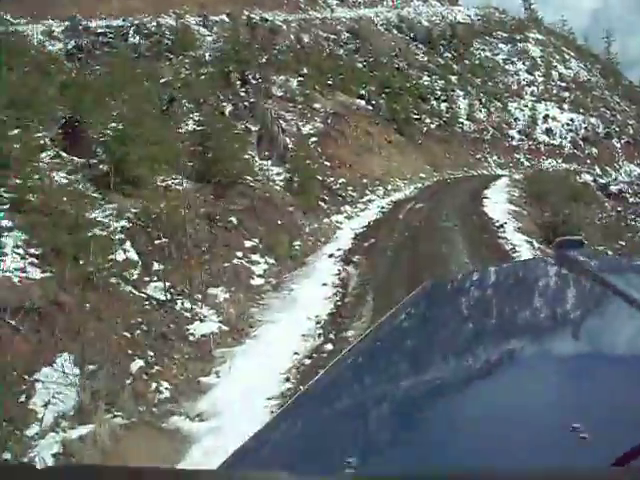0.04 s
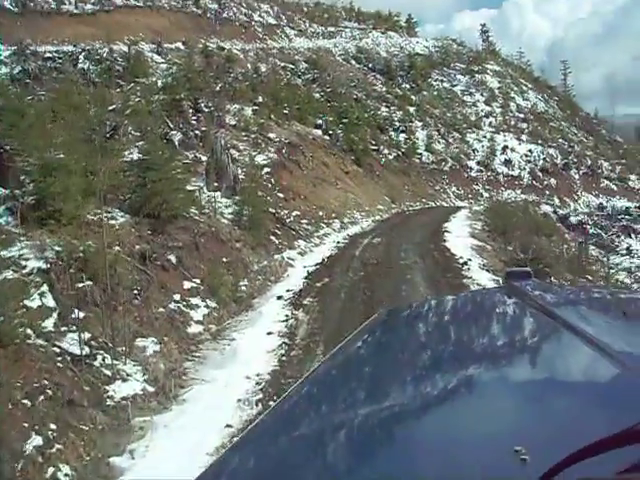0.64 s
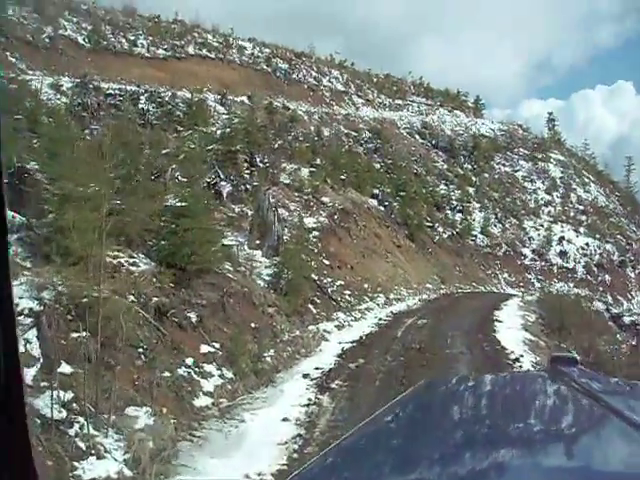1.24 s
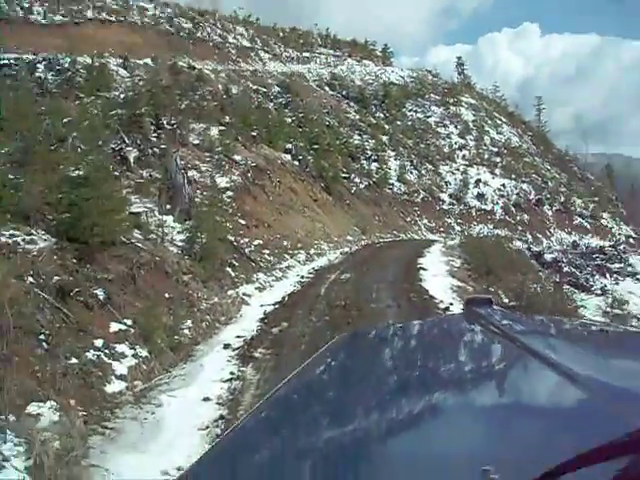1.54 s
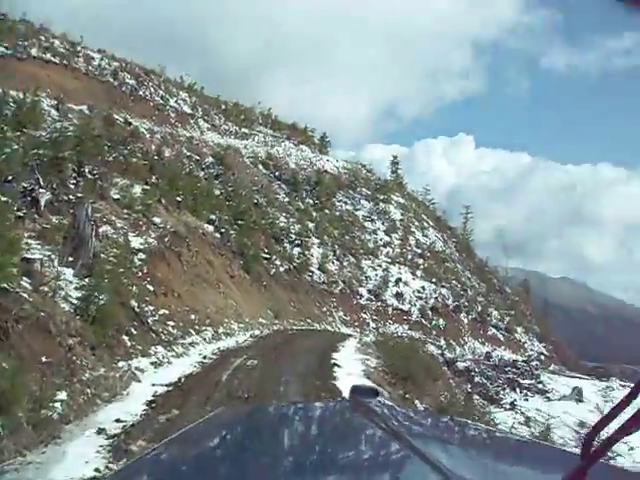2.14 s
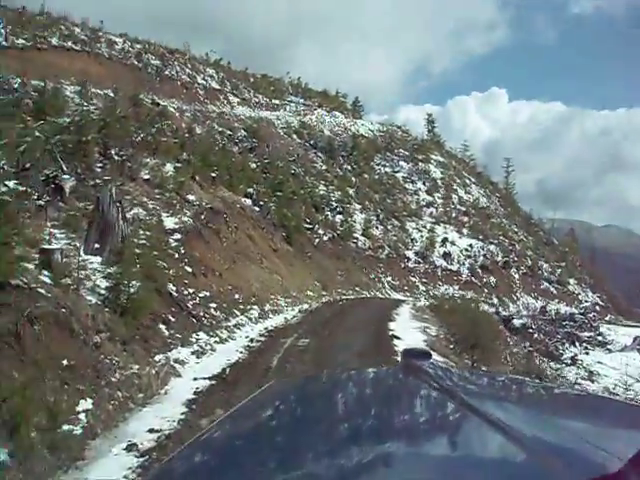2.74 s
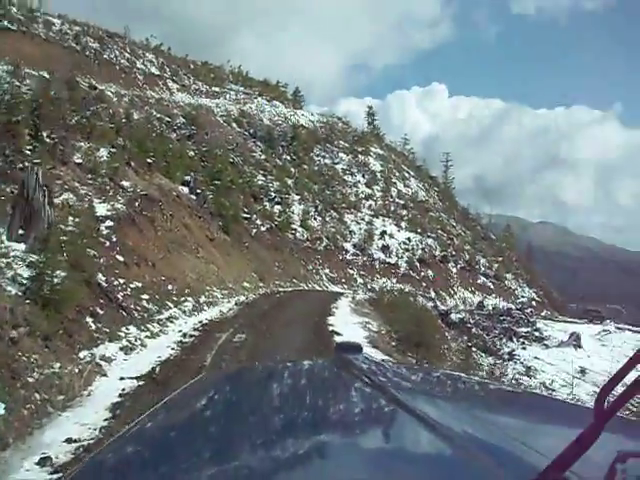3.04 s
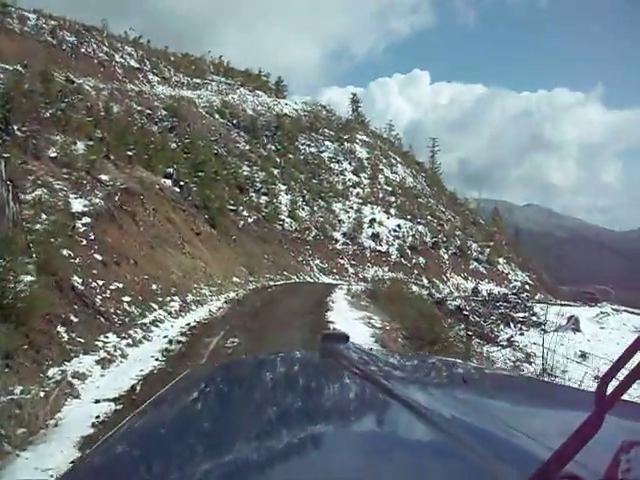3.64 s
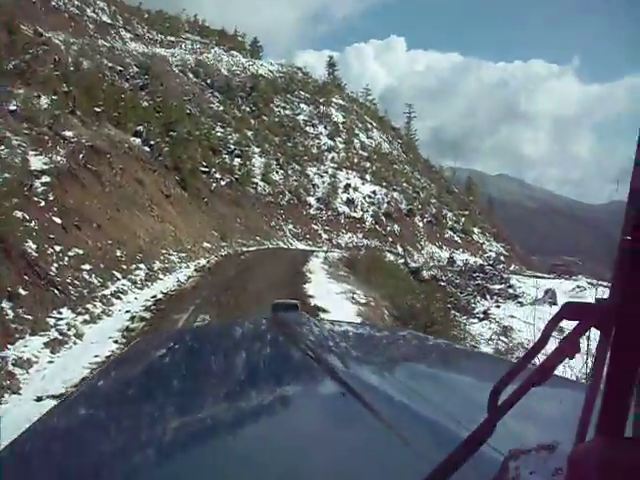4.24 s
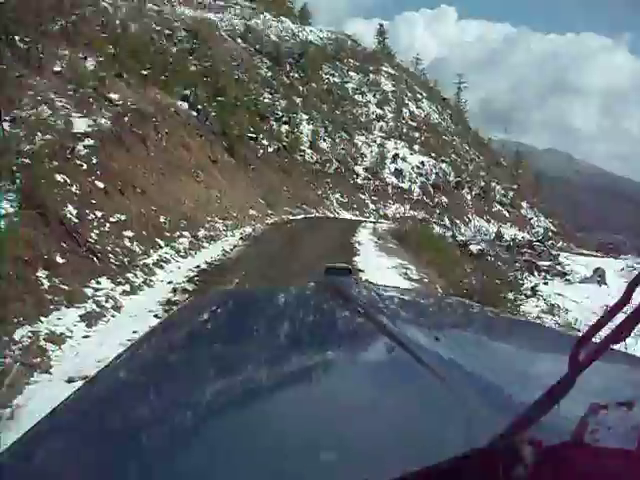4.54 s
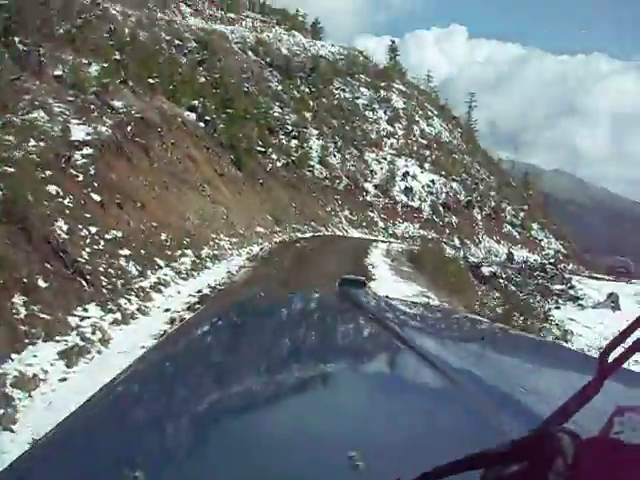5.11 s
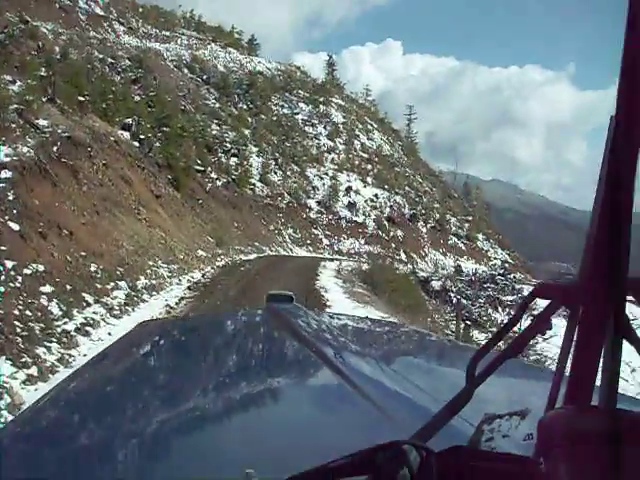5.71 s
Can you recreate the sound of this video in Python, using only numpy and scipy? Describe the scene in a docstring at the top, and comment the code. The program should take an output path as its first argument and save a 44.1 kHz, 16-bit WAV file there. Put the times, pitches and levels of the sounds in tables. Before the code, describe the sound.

A truck's diesel engine pulls along a rough gravel road, heard from the cab with tyre rumble, thumps, knocks and rattles.

```python
"""A six-cylinder diesel, heard in the cab of a loaded log truck on a gravel mountain road.
Its exhaust booms under load, eases over a rough stretch and pulls again, with injector clatter,
turbo whistle and gear whine. Tyres rumble, stones tick, bumps thump through the cab and loose
fittings knock, rattle and squeak. A small narrow-band recorder clips on the hardest hits."""
import sys
import numpy as np
from scipy import signal
from scipy.fft import rfft, irfft, next_fast_len
from scipy.io import wavfile

SR = 44100
rng = np.random.default_rng(int(sys.argv[2]) if len(sys.argv) > 2 else 0)


def master_out(mix):
    """Clip the mix to full scale and print it as 16-bit PCM to the path in sys.argv[1]."""
    frames = np.transpose(np.atleast_2d(mix))
    ceiling = np.clip(frames, -1, 1)
    pcm = np.round(ceiling * 32767).astype(np.int16)
    wavfile.write(sys.argv[1], SR, pcm)


N = 258867
T = np.arange(N) / SR

# road roughness: time_s, level_db
ROAD_ROUGHNESS = [(0, -6), (1.0, -1.5), (1.7, 5), (2.2, -4), (2.75, -0.5), (3.5, 0.5), (4.15, -9.5),
                  (4.7, -9.5), (5.3, -6), (5.87, 0.5)]
# tyre rumble: freq_hz, density_db
RUMBLE_SPECTRUM = [(30, -15), (60, 0), (110, 6), (190, 0), (300, -30), (600, -11.5), (1000, -14.5),
                   (1600, -26.5)]
# cab sway: freq_hz, density_db
SWAY_SPECTRUM = [(10, -19.5), (16, 1), (26, 9), (36, -3), (55, -19), (100, -45)]
# stone ticks: freq_hz, density_db
STONE_SPECTRUM = [(550, -6.5), (800, -3), (1020, -1.5), (1350, -1), (1900, -11.5)]
# suspension jolts: time_s, peak_db, push_s
JOLTS = [(1.57, -8, .0018), (1.638, 2.5, .0014), (1.908, -4, .0011), (2.458, -11.5, 0.0016),
         (2.755, -12, 0.0016), (2.928, -10.5, .001), (2.941, -6.5, 0.0017), (3.017, 0, 0.0016),
         (3.194, -8, 0.0018), (3.421, -9.5, 0.0021), (3.593, -5.5, 0.002), (3.795, -7, 0.0018),
         (4.01, -2.5, .0018), (5.268, -9, .002), (5.523, -7, .0014)]
# trim rubs: time_s, pitch_hz, level_db, half_width_s
TRIM_RUBS = [(3.048, 3390, -16.5, 0.017), (3.097, 4530, -17.5, 0.018), (3.424, 4240, -20, 0.017),
             (4.088, 3760, -20, 0.02), (4.205, 4100, -23.5, 0.028)]
# bursts of metal contacts: start_s, level_db, length_s
RATTLE_BURSTS = [(0.955, -20.5, 0.034), (1.603, -20, 0.033), (1.846, -10.5, 0.0023), (1.873, -19, 0.0033),
                 (1.883, -16.5, 0.018), (3.845, -19.5, .012), (4.3088, -7.5, 0.018)]
# metal contacts: freq_hz, density_db
RATTLE_SPECTRUM = [(200, -14), (500, -1.5), (900, -4), (1400, 4), (1900, 4), (2500, 6), (3300, 3.5),
                   (4200, 2.5), (5300, -4.5)]
# blows on a loose fitting: start_s, level_db
FITTING_HITS = [(1.224, -14), (2.207, -9), (2.482, -11), (2.672, -12.5), (2.797, -15.5), (2.972, -7),
                (3.089, -12.5), (3.381, -14), (3.441, -10), (3.647, -13.5), (3.754, -11.5), (3.851, -10.5),
                (3.973, -14), (5.216, -14), (5.305, -14.5)]
# fitting modes: freq_hz, gain_db, t60_s
FITTING_MODES = [(834, -21.5, 0.0027), (1070, -1.5, 0.02), (1220, -5, 0.014), (2400, -18, .002)]
# bounces of a heavy metal part: start_s, level_db
HEAVY_PART_HITS = [(1.854, 3), (1.866, -7), (1.877, -1.5), (1.889, -11), (1.896, 3), (1.900, -0.5),
                   (1.907, 6), (1.926, -8)]
# heavy part modes: freq_hz, gain_db, t60_s
HEAVY_PART_MODES = [(300, -26.5, 0.086), (488, -18, 0.11), (978, -8.5, 0.031), (1230, -4.5, 0.04),
                    (1323, -7, 0.033), (1807, -15.5, 0.024), (2170, -10.5, 0.018)]
# crank speed: time_s, turns_per_s
CRANK_SPEED = [(0, 23.7), (.25, 23.8), (.62, 25), (.75, 25.7), (.98, 27.1), (1.35, 25.75), (1.8, 26.9),
               (2.1, 27.6), (3.0, 25.2), (3.58, 25.2), (3.85, 22.6), (4.17, 20.7), (4.43, 23.6),
               (4.65, 23.5), (4.88, 24.5), (5.12, 24.35), (5.5, 23.8), (5.87, 25.8)]
# engine noise: time_s, clatter_db, air_db
ENGINE_NOISE_LEVELS = [(0, -27, -25), (.4, -26.5, -39.5), (1.1, -25, -26.5), (1.48, -24.5, -27.5),
                       (1.75, -21.5, -23.5), (2.5, -23, -20), (3.8, -25, -21.5), (4.25, -26, -20.5),
                       (4.52, -25.5, -23.5), (4.95, -22.5, -19.5), (5.28, -22, -17.5), (5.87, -22.5, -18)]
# turbo blade tone: time_s, pitch_hz, level_db
BLADE_TONE = [(0, 2585, -52), (.5, 2674, -30.5), (.92, 2824, -22), (1.1, 2933, -27.5), (1.42, 3087, -32),
              (1.75, 3356, -24), (2.1, 3490, -29), (3.5, 3562, -47.5), (4.4, 3080, -28),
              (4.78, 2995, -28.5), (5.15, 3222, -20), (5.3, 3412, -19.5), (5.55, 3447, -20),
              (5.87, 3595, -29)]
# turbo air: freq_hz, density_db
AIR_SPECTRUM = [(1500, -22), (2400, 0), (3000, 1), (3500, 6), (3900, 3.5), (4300, 1), (4700, -14),
                (5300, -25.5)]
# intake pipe resonances: freq_hz, width_hz, gain_db
INTAKE_MODES = [(2730, 22, 0), (2825, 25, 2), (2945, 25, -3), (3015, 25, 0), (3190, 40, -2), (3330, 35, -3),
                (3470, 35, 0), (3580, 35, -2), (3710, 35, 5)]
# knock of each cylinder: gain_db
CYLINDER_KNOCK_DB = [0.9, -3.5, -5, -2.5, 0, 4.5]
# diesel clatter: freq_hz, density_db
CLATTER_SPECTRUM = [(200, -22.5), (330, -10.5), (450, -12.5), (620, -11), (800, -18.5), (1020, -6),
                    (1200, -0.5), (1500, -0.5), (2000, 3), (2400, 1), (2900, 3), (3600, -2.5), (4400, -4),
                    (5300, -11.5)]
# block and firewall resonances: freq_hz, width_hz, gain_db
PANEL_MODES = [(303.7, 14, -20), (437, 40, -27), (495, 34, -26.5), (586, 50, -18), (1090, 68, -18.5),
               (1265, 150, -24), (1458, 19, -17.5), (1790, 14, -15.5), (1891, 41, -8), (2040, 45, -12),
               (2567, 17, -17)]
# weaker engine tones: crank_multiple, level_db
ENGINE_ORDERS = [(.5, -33.5), (1, -30.5), (2, -43), (2.5, -43), (3, -34.5), (3.5, -45), (4, -50),
                 (4.5, -36), (5, -42.5), (5.5, -38), (6.5, -42), (7, -45.5), (7.5, -48.5), (8, -40),
                 (8.5, -47), (9, -48), (10, -58), (11, -49), (12, -52), (12.5, -58), (13, -56)]
# exhaust boom, following load: time_s, level_db
BOOM_LEVEL = [(0, -19), (.25, -20), (.75, -15), (1.0, -27), (1.35, -12.5), (1.65, -20), (1.95, -33.5),
              (3.3, -37), (4.5, -25), (4.8, -16.5), (5.87, -17)]


def from_db(db):
    """Decibels to gain."""
    return 10 ** (np.asarray(db) / 20)


def unit_rms(x):
    """Scale to rms 1."""
    return x / np.sqrt(np.mean(x ** 2) + 1e-20)


def curves(rows):
    """Each column after time_s, at every sample."""
    times_s, *columns = np.transpose(rows)
    return [np.interp(T, times_s, column) for column in columns]


def noise():
    """White noise."""
    return rng.standard_normal(N)


def drift(rate_hz, hop=40, settle=2000):
    """Smooth random wander, rms 1."""
    r = np.exp(-2 * np.pi * rate_hz * hop / SR)
    steps = rng.standard_normal(N // hop + settle + 2)
    slow = signal.lfilter([1], [1, -2 * r, r * r], steps)[settle:]
    return np.interp(np.arange(N) / hop, np.arange(len(slow)), unit_rms(slow))


def coloured(x, spectrum, rolloff_db_per_octave=30):
    """Apply a spectrum that rolls off past its ends; rms 1."""
    size = next_fast_len(N)
    log_hz = np.log2(np.maximum(np.arange(size // 2 + 1) * SR / size, 1))
    hz, db = np.transpose(spectrum)
    octaves_outside = np.abs(log_hz - np.clip(log_hz, np.log2(hz[0]), np.log2(hz[-1])))
    gain = from_db(np.interp(log_hz, np.log2(hz), db) - rolloff_db_per_octave * octaves_outside)
    return unit_rms(irfft(rfft(x, size) * gain, size)[:N])


def resonate(x, hz, width_hz):
    """One resonance, peak gain 1."""
    r = np.exp(-np.pi * width_hz / SR)
    poles = [1, -2 * r * np.cos(2 * np.pi * hz / SR), r * r]
    return signal.lfilter([1, 0, -1], poles, x) * (1 - r * r) / 2


def ring(clicks, hz, t60_s):
    """A unit click starts a decaying sine of height 1."""
    r = np.exp(-np.log(1000) / (t60_s * SR))
    w = 2 * np.pi * hz / SR
    return signal.lfilter([0, np.sin(w)], [1, -2 * r * np.cos(w), r * r], clicks + 1e-18)


def strike(hits, modes, spread_db=1.6):
    """Each blow rings each mode with its own strength."""
    start_s, level_db = np.transpose(hits)
    scatter_db = spread_db * rng.standard_normal((len(hits), len(modes)))
    out = np.zeros(N)
    for k, (hz, gain_db, t60_s) in enumerate(modes):
        clicks = np.zeros(N)
        clicks[(start_s * SR).astype(int)] = from_db(level_db + gain_db + scatter_db[:, k])
        out += ring(clicks, hz, t60_s)
    return out


def gravel(stones_per_s=220, spread_db=3.5):
    """Small stones tick unevenly under the tyres; rms 1."""
    sizes = from_db(spread_db * np.minimum(rng.exponential(1, N), 3)) * rng.choice([-1, 1], N)
    return coloured(sizes * (rng.random(N) < stones_per_s / SR), STONE_SPECTRUM)


def road(rumble_db=-31, sway_db=-24, stones_db=-38):
    """Tyre rumble, cab sway and stone ticks rise with roughness."""
    rough_db, = curves(ROAD_ROUGHNESS)
    rumble = from_db(rumble_db + 1.05 * rough_db) * coloured(noise(), RUMBLE_SPECTRUM)
    sway = from_db(sway_db + .24 * rough_db) * coloured(noise(), SWAY_SPECTRUM)
    stones = from_db(stones_db + .33 * rough_db) * gravel()
    return rumble + sway + stones


def washboard(hits_per_s, level_db, start_s=2.15, end_s=3.9, spread_db=4.0, max_hits=40):
    """Road ripples give light, uneven hits: time_s, level_db."""
    place, size = rng.random((max_hits, 2)).T
    time_s = start_s + (np.arange(max_hits) + place) / hits_per_s
    return np.column_stack([time_s, level_db + spread_db * (2 * size - 1)])[time_s < end_s]


def bumps(push_gain=.7, snap_db=-21.5, snap_share=.51, light_push_s=.002):
    """A jolt pushes the cab air up, then snaps it down harder."""
    out = np.zeros(N)
    light = [(time_s, db, light_push_s) for time_s, db in washboard(hits_per_s=5, level_db=-14.5)]
    for time_s, peak_db, push_s in list(JOLTS) + light:
        for share, gain in ((1, 1), (snap_share, from_db(snap_db))):
            u = (T - time_s) / (push_s * share)
            near = np.abs(u) < 10
            out[near] -= gain * from_db(peak_db) * u[near] * np.exp((1 - u[near] ** 2) / 2)
    return np.where(out > 0, push_gain * out, out)


def cab(jolts, ring_db=-30.5, ring_hz=118, t60_s=.021):
    """The jolts plus a brief ring of the cab air."""
    return jolts + from_db(ring_db) * ring(jolts, ring_hz, t60_s) * 2 * np.pi * ring_hz / SR


def squeaks(width_hz=260):
    """Trim rubs as the cab twists: short, pitched scratches."""
    out, friction = np.zeros(N), noise()
    for time_s, pitch_hz, level_db, half_width_s in TRIM_RUBS:
        envelope = np.exp(-np.minimum(((T - time_s) / half_width_s) ** 2, 20))
        out += from_db(level_db) * envelope * unit_rms(resonate(friction, pitch_hz, width_hz))
    return out


def rattles(attack_s=.003, decay_s=.009, panel_db=-7.5):
    """Metal parts chatter in dense bursts and ring a panel."""
    envelope = np.zeros(N)
    for start_s, level_db, length_s in RATTLE_BURSTS:
        rise = np.clip((T - start_s) / attack_s, 0, 1)
        fall = np.exp(-np.maximum(T - start_s - length_s, 0) / decay_s)
        envelope += from_db(level_db) * rise * fall
    contacts = coloured(noise(), RATTLE_SPECTRUM)
    panel = from_db(panel_db) * unit_rms(resonate(noise(), hz=1750, width_hz=160))
    return envelope * (contacts + panel)


def knocks(gain_db=.2):
    """A loose fitting knocks on big shakes and chatters over the washboard."""
    hits = np.vstack([FITTING_HITS, washboard(hits_per_s=11, level_db=-21)])
    return from_db(gain_db) * strike(hits, FITTING_MODES)


def clunks():
    """A heavy metal part bounces in the big jolt."""
    return strike(HEAVY_PART_HITS, HEAVY_PART_MODES)


def gears(turns, start_s=4.86, end_s=5.6, attack_s=.04, release_s=.08,
          level_db=-25, sag_db_per_s=10.5, mesh_per_turn=104.8, buzz_db=-3.0):
    """Meshing teeth whine and buzz the firewall in the hard pull; the level sags."""
    envelope = np.exp(np.minimum(T - start_s, 0) / attack_s - np.maximum(T - end_s, 0) / release_s)
    mesh_db = level_db - sag_db_per_s * np.maximum(T - start_s, 0)
    whine = from_db(2.5 * drift(15)) * np.sin(2 * np.pi * mesh_per_turn * turns + .7 * drift(10))
    buzz = from_db(buzz_db) * unit_rms(resonate(noise(), hz=1895, width_hz=45))
    return envelope * from_db(mesh_db) * (whine + buzz)


def turbo(turns, air_db, ragged_above_db=-26, howl_width_hz=165, pipe_db=2.5, hiss_db=-4.5):
    """Air hisses; as flow grows, the blade tone turns to a ragged howl that rings the intake."""
    pitch_hz, whistle_db = curves(BLADE_TONE)
    blade = from_db(whistle_db) * np.exp(2j * np.pi * np.cumsum(pitch_hz) / SR)
    surge_db = np.maximum(air_db - ragged_above_db, 0)
    gulps = 1 + .8 * np.cos(2 * np.pi * 3 * turns)  # intake strokes add side tones
    waver = .6 + .4 * (drift(10) + 1j * drift(10))
    tone = from_db(-.55 * surge_db) * (blade * waver).real * gulps
    raggedness = drift(howl_width_hz) + 1j * drift(howl_width_hz)
    howl = .53 * from_db(.27 * surge_db) * (blade * raggedness).real
    pipe = sum(from_db(db + pipe_db) * resonate(howl, hz, width_hz) for hz, width_hz, db in INTAKE_MODES)
    hiss = coloured(noise(), AIR_SPECTRUM) * from_db(air_db + hiss_db + drift(6))
    return tone + .5 * howl + pipe + hiss


def clatter(turns, depth=.43, decay_strokes=.33, scatter_db=2.0, body_db=1.5):
    """Each firing and injector stroke is a burst of fine impacts in block and firewall."""
    stroke, stroke_phase = np.divmod(6 * turns, 1)
    stroke = stroke.astype(int)
    cylinder = stroke // 2 % len(CYLINDER_KNOCK_DB)
    strength = from_db(np.array(CYLINDER_KNOCK_DB)[cylinder] + scatter_db * noise()[stroke])
    bursts = 1 - depth / 2 + depth * strength * np.exp(-stroke_phase / decay_strokes)
    shake = noise() * bursts
    panels = sum(from_db(db) * unit_rms(resonate(shake, hz, width_hz))
                 for hz, width_hz, db in PANEL_MODES)
    return from_db(body_db) * coloured(noise() * bursts, CLATTER_SPECTRUM) + panels


def exhaust(turns, boom_db, boom_waver_db=.5, order_waver_db=2.0, load_share=.068, jitter_rad=.48):
    """Three firings a turn boom at their second harmonic; uneven cylinders add half orders."""
    out = from_db(boom_db + boom_waver_db * drift(14)) * np.sin(2 * np.pi * 6 * turns)
    load_db = load_share * (boom_db - np.mean(boom_db))
    for multiple, level_db in ENGINE_ORDERS:
        phase = 2 * np.pi * (multiple * turns + rng.random()) + jitter_rad * drift(6.8)
        out += from_db(level_db + load_db * (multiple > 2) + order_waver_db * drift(2)) * np.sin(phase)
    return np.sqrt(2) * out


def scene():
    """Engine, road and loose parts at the seat; mono."""
    turns_per_s, = curves(CRANK_SPEED)
    boom_db, = curves(BOOM_LEVEL)
    clatter_db, air_db = curves(ENGINE_NOISE_LEVELS)
    turns = np.cumsum(turns_per_s) / SR
    diesel = exhaust(turns, boom_db) + from_db(clatter_db) * clatter(turns)
    whines = turbo(turns, air_db) + gears(turns)
    loose_parts = knocks() + clunks() + rattles() + squeaks()
    return (diesel + whines + loose_parts + road() + cab(bumps()))[None]


def record(dry, edge_hz=5123, upper_band_hz=(5250, 6020), upper_band_db=-14.5, clip_level=.73, cutoff_hz=15870):
    """Narrow-band recorder: a faint band sounds just past its edge; clips on the hardest hits."""
    narrow = signal.sosfilt(signal.cheby1(12, .2, edge_hz, fs=SR, output="sos"), dry)
    upper_band = signal.sosfilt(signal.cheby1(6, .5, upper_band_hz, "band", fs=SR, output="sos"), dry)
    clipped = np.clip(narrow + from_db(upper_band_db) * upper_band, -clip_level, clip_level)
    return signal.sosfilt(signal.ellip(10, .1, 80, cutoff_hz, fs=SR, output="sos"), clipped)


dry = scene()
out = record(dry)
master_out(out)
```